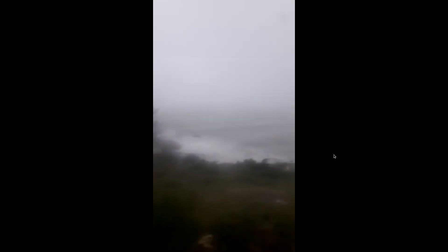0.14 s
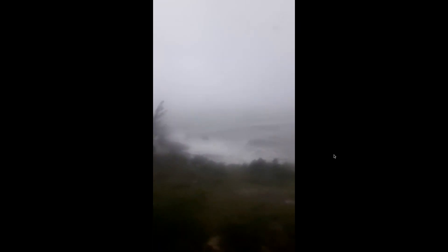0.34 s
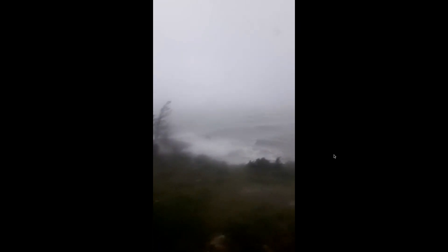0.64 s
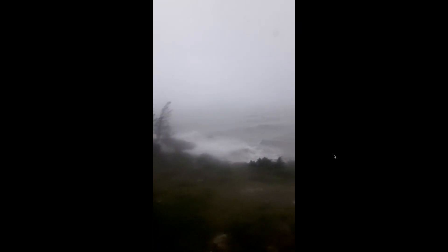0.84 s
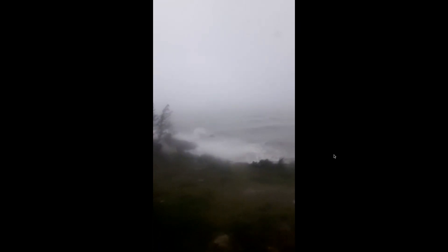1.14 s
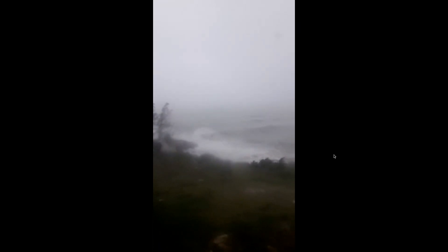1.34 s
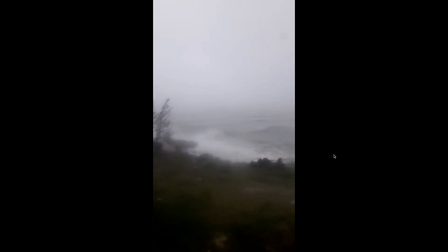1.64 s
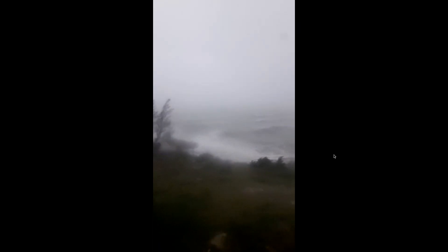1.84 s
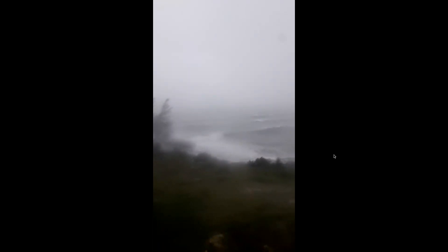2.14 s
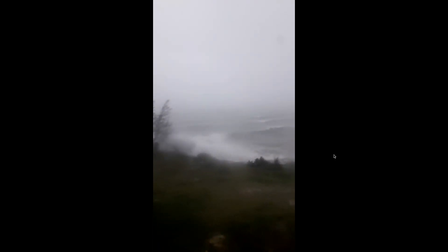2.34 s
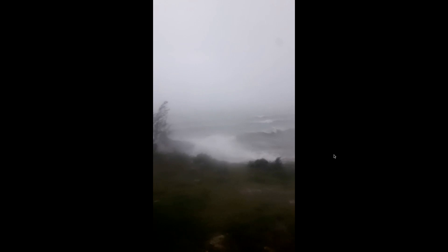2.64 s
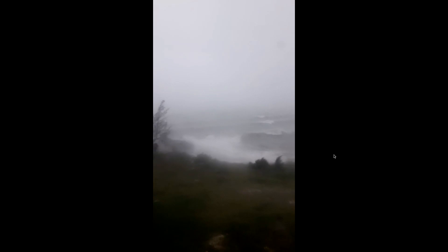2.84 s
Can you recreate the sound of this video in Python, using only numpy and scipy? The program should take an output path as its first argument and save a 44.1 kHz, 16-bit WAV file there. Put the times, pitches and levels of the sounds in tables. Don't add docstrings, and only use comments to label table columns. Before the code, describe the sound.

Strong storm wind forces through gaps beside a sheltered mono microphone. A ragged, whistling surge builds from 0.1 s, with its sharpest hiss around 0.3-0.45 s, then eases. From 0.6 to 1.9 s a lull leaves low wind and surf roar, soft booms, faint rain hiss and sparse drop ticks. A second blast hits at 1.95 s with a dull thud, flutters until 2.4 s, drops away, and stirs slightly near 2.9 s.

```python
import sys
import numpy as np
from scipy import signal
from scipy.io import wavfile

SR = 44100
rng = np.random.default_rng(int(sys.argv[2]) if len(sys.argv) > 2 else 0)


def pcm_store(signal):
    levels = np.round(np.clip(np.atleast_2d(signal), -1, 1) * 32767)
    wavfile.write(sys.argv[1], SR, levels.astype(np.int16).T)


def ratio(d):
    e = np.asarray(d, float) / 20
    return 10 ** e


N = 132300

# t/s, flow level/dB, sharpness (edge hiss against flow)/dB
GUSTS = [(0, -30, -22), (0.11, -36.5, -21.5), (0.313, -21, -18.5), (0.408, -23, -1), (0.489, -32, -19),
         (1.05, -35, -25), (1.48, -47.5, -28), (1.861, -40.5, -20), (1.944, -24, -8), (2.076, -24, -21),
         (2.21, -19.5, -13), (2.277, -26.5, -6.5), (2.309, -31.5, -17.5), (2.378, -27, -18),
         (2.57, -42, -21), (2.74, -34, -25), (2.89, -38.5, -24), (3.0, -31.5, -13.5)]
# t/s, peak level/dB, favoured f/Hz, length/s
PUFFS = [(0.15, -11.5, 1920, 0.021), (0.153, -10, 5600, 0.026), (0.225, -15, 2000, 0.026),
         (0.262, -7.5, 1990, 0.013), (0.288, -21, 2010, 0.019), (.357, -1.5, 4280, 0.0066),
         (0.364, -2, 5800, 0.014), (0.374, -10, 1870, 0.043), (0.4, -1, 4940, 0.0084),
         (0.511, -21, 1850, 0.0099), (0.529, -15, 1950, 0.026), (0.746, -38, 1880, 0.0048),
         (2.939, -18.5, 4300, 0.031), (0.998, -21, 2160, 0.031), (1.152, -24.5, 3760, 0.038),
         (2.899, -19.5, 2750, 0.069), (1.228, -19, 1780, 0.014), (1.293, -25, 4000, 0.017),
         (1.618, -28.5, 2100, 0.041), (1.732, -22.5, 3900, 0.023), (1.922, -29, 3070, 0.0055),
         (1.949, -6.5, 2230, 0.022), (1.958, -6, 5100, 0.024), (2.097, -18, 2060, 0.01),
         (2.089, -5.5, 5030, 0.0094), (2.139, -6, 4800, 0.029), (2.193, -14, 2460, 0.016),
         (2.227, -13, 5100, 0.016), (2.326, -10, 5230, 0.052), (2.692, -37, 3540, 0.057)]
# t/s, peak level/dB, favoured f/Hz, length/s
SPITS = [(0.0785, -10, 9550, 0.0099), (0.315, -3.5, 8980, 0.021), (0.327, 2, 8950, 0.05),
         (0.357, 3, 8640, 0.024), (0.39, 2, 8600, 0.013), (0.446, 0.5, 10800, 0.0033),
         (0.318, -2, 13900, .012), (0.345, 1, 12500, 0.044), (0.436, -11.5, 11100, 0.031),
         (0.385, -6, 6550, 0.053), (0.966, -27.5, 10000, 0.037), (1.953, -2.5, 13900, 0.026),
         (1.958, -3, 7500, 0.016), (2.09, -13, 13000, .02), (2.19, -6, 13500, 0.034),
         (2.255, -16, 11000, .03), (2.633, -28, 9600, 0.013), (1.164, -27, 10350, 0.022),
         (1.882, -20, 9250, 0.014), (1.923, -28, 9560, 0.0055), (1.941, -10.5, 10200, 0.073),
         (2.09, -5.5, 8200, 0.017), (2.167, -5, 9470, 0.0074), (2.206, -3.5, 8950, 0.018),
         (2.335, -17, 9550, 0.015), (2.37, -18, 9800, .015), (2.944, -21, 9530, 0.013),
         (2.986, -17, 10500, 0.012)]
# f/Hz, width/Hz, level/dB
CAVITIES = [(1275, 64, -16.5), (1696, 92.7, -5.5), (1780, 82, -6.5), (1978, 145, 0.5), (2357, 127, -10),
            (2394, 360, -6.5), (2750, 160, -5.5), (3073, 410, -18), (3680, 428, -10), (4296, 315, -3),
            (4707, 205, -9.5), (5170, 295, -15.5), (5350, 450, -12.5), (5545, 354, -11.5)]
# f/Hz, width/Hz, level/dB
EDGES = [(6530, 1700, 6.5), (7500, 450, -0.5), (8950, 300, 9.5), (9614, 470, 12.5), (10000, 400, 4.5),
         (10590, 340, 8), (11520, 550, 3.5), (13000, 560, -4), (14200, 680, -10), (15600, 600, -30)]
# f/Hz, level per Hz/dB
LEAK = [(710, -48), (1200, 6.5), (1990, 6.5), (3150, 4.5), (5440, -11), (8080, -26.5), (10500, 3),
        (15500, -56)]
# t/s, peak level/dB, f/Hz, length/s
WHISTLES = [(0.177, -18.5, 1966, .01), (.236, -20, 1982, .012), (.271, -10, 2000, 0.017),
            (0.283, -15, 2000, 0.013), (0.296, -9, 1968, 0.0081), (0.271, -21.5, 5600, .012),
            (0.224, -26, 5350, .012), (0.371, -14, 5730, 0.013), (0.38, -14, 1766, 0.011),
            (.399, -59, 4250, 0.0088), (0.408, -18, 3700, 0.011), (0.431, -21, 5630, 0.019),
            (0.532, -10, 2010, 0.0092), (0.316, -19, 2010, 0.01), (0.547, -25.5, 4260, 0.015),
            (0.583, -19.5, 1990, 0.016), (0.742, -17.5, 1976, 0.009), (0.799, -22, 1900, 0.0058),
            (0.839, -21.5, 1980, 0.0074), (0.877, -36, 1980, .008), (1.028, -28.5, 4140, 0.016),
            (1.965, -9, 1976, 0.011), (2.034, -19, 4250, 0.023), (2.069, -22.5, 5650, 0.0095),
            (2.094, -19, 4290, 0.012), (2.102, -7, 2020, 0.0096), (2.163, -18, 5370, 0.01),
            (2.197, -10, 1827, 0.0076), (2.198, -11, 4356, 0.0073), (2.207, -16, 5600, .01),
            (2.263, -18, 5370, 0.0076), (2.269, -21, 1720, 0.019), (2.331, -20, 4580, .008),
            (2.332, -25, 5500, 0.0071), (1.995, -23, 5500, 0.0093), (1.954, -16, 2080, .008),
            (2.356, -21.5, 3630, .012), (2.362, -16.5, 2750, 0.012), (2.695, -27.5, 2016, 0.014),
            (2.715, -29, 4310, 0.014), (2.744, -26, 4320, 0.008), (2.777, -30, 1953, 0.0096),
            (2.942, -17.5, 4300, 0.0072), (2.948, -21.5, 2946, 0.012)]
# t/s, peak level/dB, f/Hz, length/s
DROPS = [(0.31, -43, 13400, 0.02), (1.174, -38.5, 10300, 0.0067), (1.17, -49, 7500, 0.0089),
         (1.34, -51, 8920, 0.005), (1.544, -23, 4230, 0.004), (1.64, -48, 6600, 0.0051),
         (1.738, -31.5, 5480, 0.004), (2.347, -16.5, 2750, 0.013), (2.669, -24, 4290, 0.004),
         (2.687, -39, 4280, 0.0041), (2.994, -19.5, 4230, .008)]
# f/Hz, level per Hz/dB
ROAR = [(12, -54), (20, -22), (70, -26.5), (151, -5.5), (199, -9), (326, -7.5), (800, -13.5), (1060, -8.5),
        (1200, -17), (1560, -44), (2640, -120)]
# t/s, peak level/dB, length/s
BUFFETS = [
    (0.004, -16, 0.0053),
    (0.21, -20, 0.09),
    (0.633, -32, 0.025),
    (0.806, -13, 0.018),
    (2.071, -18.5, 0.018),
    (2.318, -18, 0.04),
    (2.44, -49, 0.058),
]
# t/s, peak level/dB, length/s
DOOR_BUFFETS = [
    (0.639, -30.5, 0.041),
    (0.929, -34.5, 0.043),
    (1.148, -39, 0.045),
    (2.366, -33, 0.053),
]
# f/Hz, level per Hz/dB
FAR = [(710, -43), (1200, 4), (1550, -10), (1690, 7.5), (3580, -0.5), (4070, -36), (6110, -43),
       (15500, -17)]


def rms_one(x):
    return x / np.sqrt(np.mean(x ** 2) + 1e-20)


def drift(rate_hz):
    step = 20
    r = np.exp(-2 * np.pi * step * rate_hz / SR)
    noise = rng.standard_normal(N // step + 3002)
    slow = signal.lfilter([1], [1, -2 * r, r * r], noise)[3000:]
    return np.interp(np.arange(N) / step, np.arange(len(slow)), rms_one(slow - slow.mean()))


def resonate(x, hz, width_hz):
    r = np.exp(-np.pi * max(width_hz, 10) / SR)
    b = (1 - r * r) / 2 * np.array([1, 0, -1])
    a = [1, -2 * r * np.cos(2 * np.pi * hz / SR), r * r]
    return signal.lfilter(b, a, signal.lfilter(b, a, x)) * np.sqrt(SR / width_hz)


def whistle(hz, wander_hz):
    pitch_hz = hz + wander_hz * drift(200)
    return np.sqrt(2) * np.sin(2 * np.pi * np.cumsum(pitch_hz) / SR)


def swell(start_s, length_s):
    t = np.maximum(np.arange(N) / SR - start_s, 0) / max(length_s * 0.47, 0.001)
    return (t * np.exp(1 - t)) ** 2


def banded_noise(spectrum, patchy_db, low_hz, octaves):
    out = 0
    edges = low_hz * 2 ** np.arange(0, octaves, 1 / 3)
    f, level = np.array(spectrum).T
    white = rng.standard_normal((2, N))
    for k, (low, high) in enumerate(zip(edges, edges[1:])):
        sos = signal.butter(2, [low, high], "band", fs=SR, output="sos")
        band = signal.sosfilt(sos, white[k % 2])
        level_db = np.interp(np.log(low * high) / 2, np.log(f), level)
        out = out + ratio(level_db + patchy_db * drift(5.0)) * band
    return rms_one(out)


def blown_resonances(table, flow_db, flicker_db, tilt, pushes, push_db, reach_octaves):
    shapes = np.array([swell(t, length) for t, _, _, length in pushes])
    _, peak_db, push_hz, _ = np.array(pushes).T
    out = 0
    for hz, width_hz, db in table:
        flicker = flicker_db * drift(30)
        hiss_db = flow_db + flicker + tilt * np.log2(hz / 3000)
        hiss = resonate(ratio(hiss_db) * rng.standard_normal(N), hz, width_hz)
        nearness = np.exp(-(np.log2(hz / push_hz) / reach_octaves) ** 2)
        power = ratio(push_db) ** 2 * ((ratio(peak_db) ** 2 * nearness) @ shapes)
        tone = np.sqrt(power) * ratio(0.45 * flicker) * whistle(hz, 0.55 * width_hz)
        out = out + ratio(db) * (hiss + tone)
    return out / np.sqrt(sum(ratio(db) ** 2 for _, _, db in table))


def gaps(flow_db, sharp_db):
    shared_db = 1 * drift(31.5) + 1 * drift(112)
    air_db = flow_db + shared_db
    tilt = 0.38 * (sharp_db - sharp_db.mean())
    hollows = blown_resonances(CAVITIES, air_db, 1.5, tilt, PUFFS, push_db=-5, reach_octaves=0.32)
    edges = blown_resonances(EDGES, air_db + sharp_db, 2.2, 0, SPITS, push_db=-20, reach_octaves=0.27)
    leak = ratio(air_db - 11) * banded_noise(LEAK, patchy_db=2.5, low_hz=1046, octaves=4.1)
    return hollows + edges + leak


def whistles():
    turns = np.cumsum(1 + 0.025 * drift(200)) / SR
    return sum(ratio(db) * swell(t, length) * np.sin(2 * np.pi * hz * turns)
               for t, db, hz, length in WHISTLES)


def drops():
    return sum(ratio(db) * np.sqrt(swell(t, length) / 2) * whistle(hz, 0.018 * hz)
               for t, db, hz, length in DROPS)


def knock():
    tones = sum(whistle(hz, 35.4) for hz in (716, 800, 920, 1051))
    return ratio(-26) * np.sqrt(swell(1.957, 0.011)) * tones


def humming(hz, width_hz):
    return rms_one(resonate(rng.standard_normal(N), hz, width_hz))


def buffeted(rows, hz, wander_hz, gain_db):
    power = sum(ratio(db + gain_db) ** 2 * swell(t, length) for t, db, length in rows)
    return np.sqrt(power) * whistle(hz, wander_hz)


def rumble(flow_db):
    level_db, boom_hz, door_hz = -32.5, 146.7, 331.8
    change_db = flow_db - flow_db.mean()
    slow_db = signal.filtfilt(*signal.butter(1, 0.7, fs=SR), change_db)
    roar = banded_noise(ROAR, patchy_db=1, low_hz=20.7, octaves=8.0)
    glass = signal.cheby2(8, 40, 772 * 1.05, fs=SR, output="sos")
    roar = signal.sosfilt(glass, roar) + ratio(-11.5) * roar
    boom = ratio(-4 + 1.5 * drift(13.0)) * humming(boom_hz, 27)
    door = ratio(-16.5) * humming(door_hz, 54)
    steady = ratio(level_db - 1.0 + 0.58 * slow_db) * (roar + boom + door)
    panel_db = level_db - 13 + 0.4 * change_db + 1.5 * drift(24.0)
    panel = ratio(panel_db) * humming(767.6, 85)
    shelter_kicks = buffeted(BUFFETS, boom_hz, 5.3, gain_db=-9)
    door_kicks = buffeted(DOOR_BUFFETS, door_hz, 15.7, gain_db=0)
    return steady + panel + shelter_kicks + door_kicks


def far_hiss():
    return ratio(-48.5) * banded_noise(FAR, patchy_db=1.2, low_hz=767, octaves=4.8)


def shelter(x):
    t60_s, level_db, delay_s = 0.06, -7, 0.003
    t = np.arange(SR // 2) / SR
    tail = rng.standard_normal(len(t)) * ratio(-60 * t / t60_s) * (t > delay_s)
    tail *= ratio(level_db) / np.sqrt(np.sum(tail ** 2))
    tail[0] = 1
    return signal.fftconvolve(x, tail / np.sqrt(np.sum(tail ** 2)))[:N]


def scene():
    t, flow, sharp = np.transpose(GUSTS)
    now = np.arange(N) / SR
    flow_db, sharp_db = np.interp(now, t, flow), np.interp(now, t, sharp)
    bright = gaps(flow_db, sharp_db) + whistles() + drops() + far_hiss()
    mix = shelter(bright) + knock() + rumble(flow_db)
    return mix[None]


def band_limit(x):
    return signal.sosfilt(signal.butter(12, 15700, fs=SR, output="sos"), x)


def record(dry):
    dip_hz, dip_width_hz, dip_depth = 1060, 220, 0.55
    b, a = signal.iirpeak(dip_hz, dip_hz / dip_width_hz, fs=SR)
    dipped = dry - dip_depth * signal.lfilter(b, a, dry)
    top_cut = signal.cheby2(12, 70, 16600, fs=SR, output="sos")
    mix = signal.sosfilt(top_cut, dipped)
    return band_limit(mix)


dry = scene()
out = record(dry)
pcm_store(out)
```